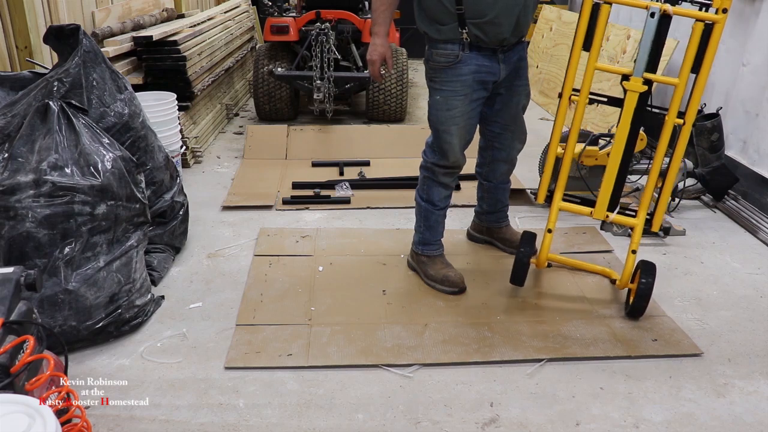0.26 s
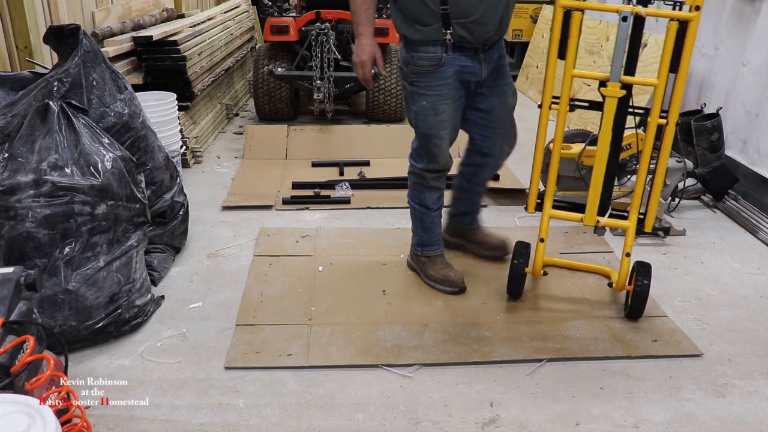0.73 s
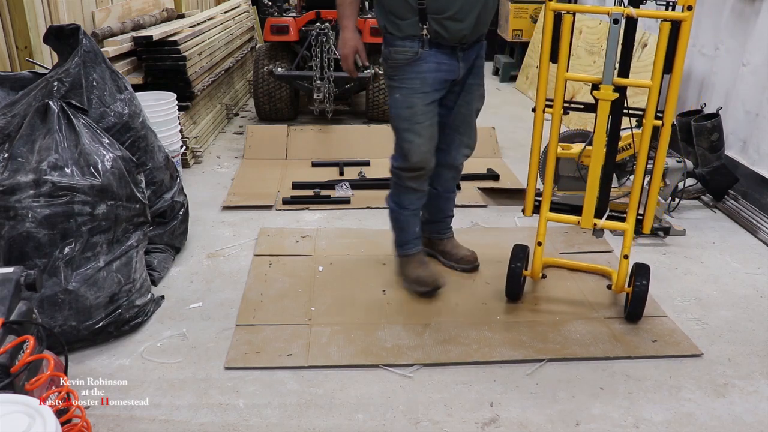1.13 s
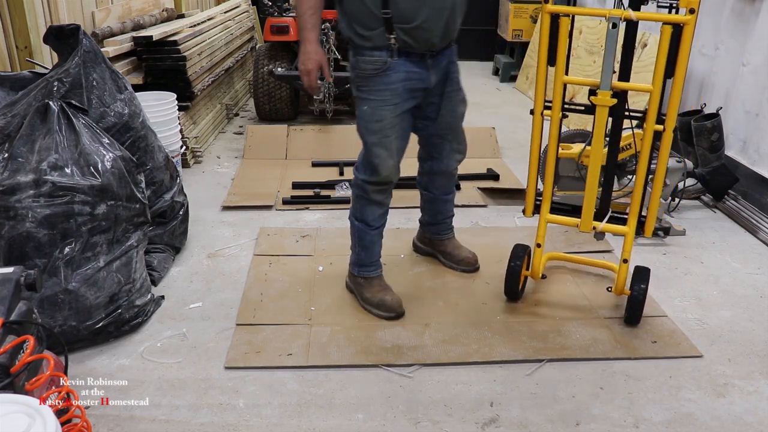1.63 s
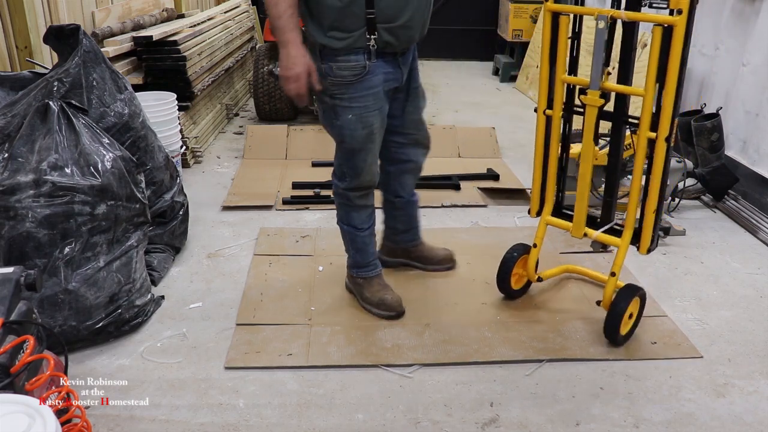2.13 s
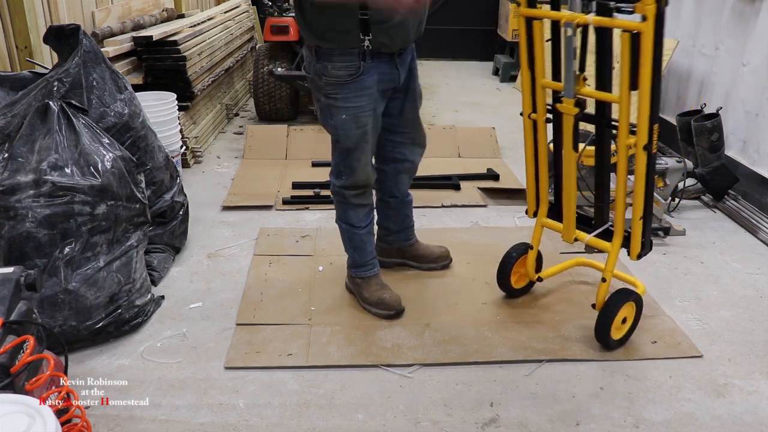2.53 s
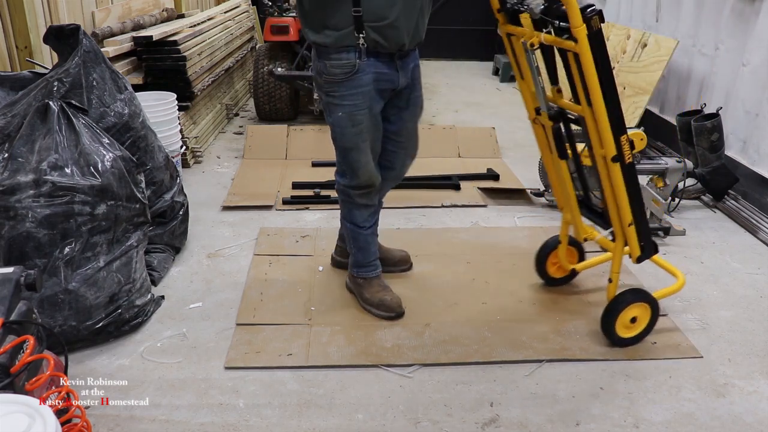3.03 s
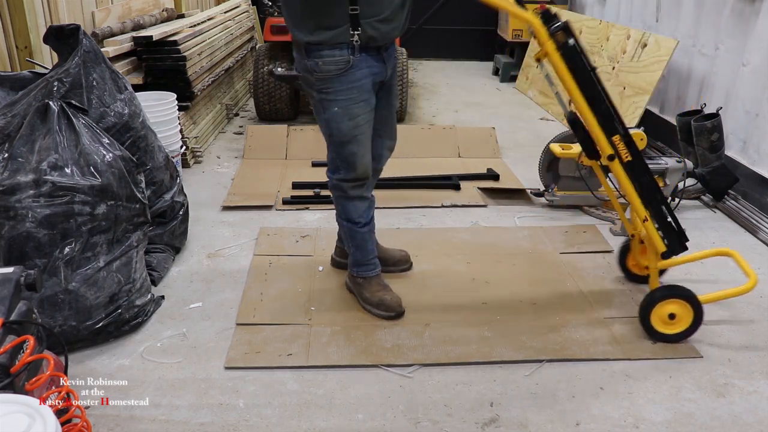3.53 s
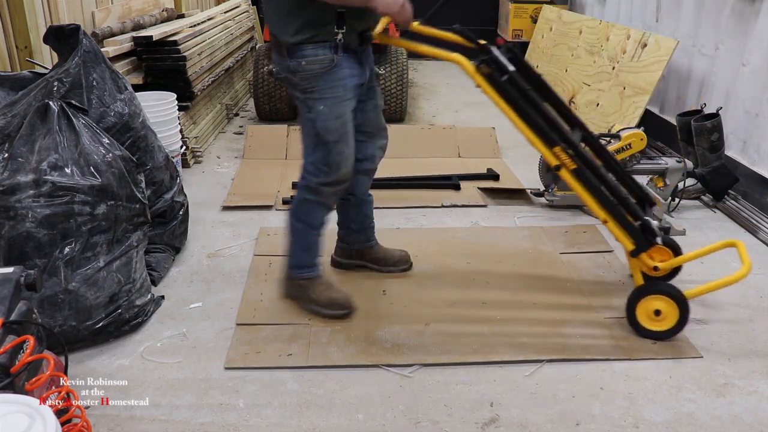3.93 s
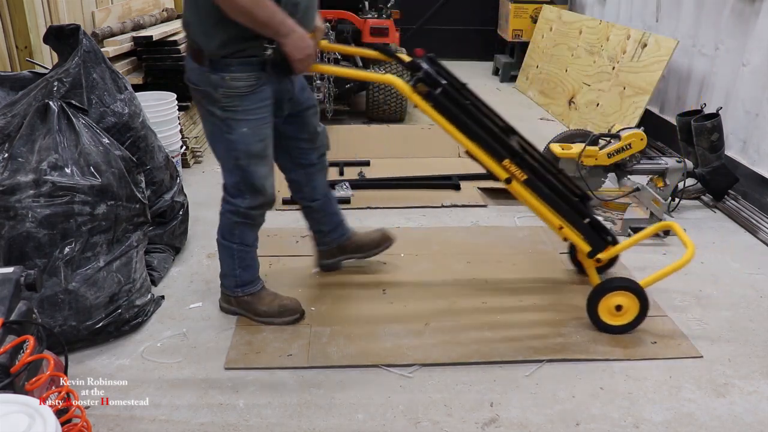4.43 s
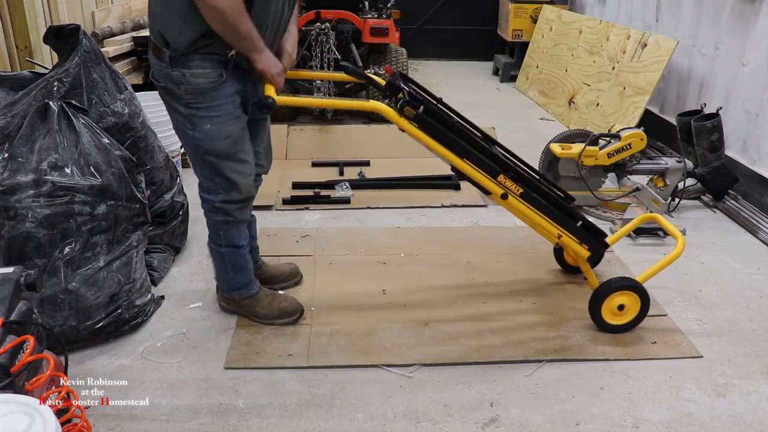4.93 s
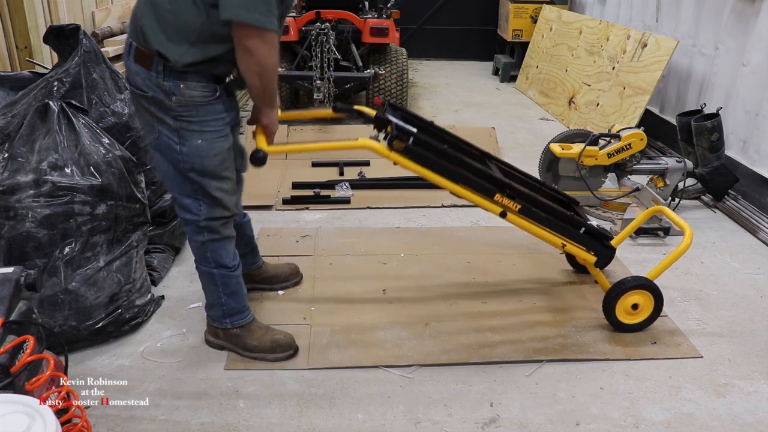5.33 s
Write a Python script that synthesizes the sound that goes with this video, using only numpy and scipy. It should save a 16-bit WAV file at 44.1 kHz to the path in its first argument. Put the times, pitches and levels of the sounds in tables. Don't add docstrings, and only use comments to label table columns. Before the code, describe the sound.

In a hard-surfaced workshop, boots shuffle on cardboard and a steel stand knocks in a loose cluster near the start. A short wheel slide follows, then a loud bright clack in the middle, more scuffs, a brief metallic squeal and a strong hollow thud near the end. Close stereo microphone, source slightly right, short reverberation over faint room tone.

```python
import sys
import numpy as np
from scipy import signal
from scipy.fft import rfft, irfft
from scipy.io import wavfile

SR = 44100
rng = np.random.default_rng(int(sys.argv[2]) if len(sys.argv) > 2 else 0)


def unload_audio(sound):
    columns = np.transpose(np.atleast_2d(sound))
    steps = np.round(np.clip(columns, -1, 1) * 32767)
    wavfile.write(sys.argv[1], SR, steps.astype(np.int16))


def makeup_ratio(level_db):
    decades = np.asarray(level_db, float) / 20
    return 10 ** decades


N = 245844


def at_hz(points, hz):
    table = np.array(points)
    return np.interp(np.log(hz), np.log(table[:, 0]), table[:, 1])


def in_time(rows, after_db=-120):
    s, *columns = np.transpose(rows)
    t = np.arange(N) / SR
    return [np.interp(t, s, column, left=-120, right=after_db) for column in columns]


def band(x, low_hz, high_hz):
    corners = [low_hz, min(high_hz, 0.45 * SR)]
    return signal.sosfilt(signal.butter(2, corners, "band", fs=SR, output="sos"), x)


def rms_one(x):
    return x / np.sqrt(np.mean(x ** 2) + 1e-20)


def ring(x, hz, t60):
    r, w = makeup_ratio(-60 / (t60 * SR)), 2 * np.pi * hz / SR
    return signal.lfilter([0, np.sin(w)], [1, -2 * r * np.cos(w), r * r], x + 1e-18)


def grit(per_s, spread_db):
    sizes = makeup_ratio(spread_db * np.minimum(rng.exponential(1, N), 5)) * rng.choice([-1, 1], N)
    catches = rng.random(N) < per_s / SR
    return rms_one(sizes * catches) + 0.56 * rng.standard_normal(N)


# frequency_hz, left_right_correlation [-1..1]
COHERENCE = [(100, 0.93), (300, 0.82), (600, 0.82), (1200, 0.19), (2500, 0.16), (8000, 0.075),
             (16000, 0.037)]


def stereo_bands(size):
    edges = 26 * 2 ** np.arange(0, 10, 0.5)
    white = rng.standard_normal((2, 2, size))
    for k, (low, high) in enumerate(zip(edges, edges[1:])):
        centre_hz = np.sqrt(low * high)
        mid, side = band(white[k % 2], low, high)
        alike = np.clip(at_hz(COHERENCE, centre_hz), -1, 1)
        yield centre_hz, np.sqrt(1 + alike) * mid + np.sqrt(1 - alike) * side * [[1], [-1]]


# start_s, level_db
RUSTLE = [(0.0, -33), (0.12, -58.5), (0.36, -45.5), (0.57, -44.5), (0.73, -56), (2.22, -42), (2.53, -63),
          (2.84, -58), (3.05, -44), (3.4, -40.5), (3.6, -40.5), (3.75, -40), (3.97, -43.5), (4.2, -44.5),
          (4.73, -33), (5.01, -46), (5.21, -63), (5.57, -36)]
RUSTLE_DB = [-20.5, -10.5, -10]
RUSTLE_FOLLOWS = [0.26, 1.0, 0.35]
# frequency_hz, level_db
HUM = [(18, -34), (30, 13.5), (81, 16), (479, 8.5), (639, 9), (1870, 9), (4420, 7), (15500, -38.5)]


def background():
    bustle_db = in_time(RUSTLE, after_db=RUSTLE[-1][1])[0]
    mean_db = bustle_db.mean()
    low_db, mid_db, high_db = (mean_db + db + share * (bustle_db - mean_db)
                               for db, share in zip(RUSTLE_DB, RUSTLE_FOLLOWS))
    bands = list(stereo_bands(N))
    hum = rms_one(sum(makeup_ratio(at_hz(HUM, hz)) * pair for hz, pair in bands))
    low = rms_one(sum(pair for hz, pair in bands if 90 < hz < 650))
    mid = rms_one(sum(pair / (1 + (hz / 3000) ** 2.0) for hz, pair in bands if hz > 650))
    high = rms_one(sum(pair * min(hz / 8000, 8000 / hz) ** 0.93 for hz, pair in bands if hz > 4000))
    return makeup_ratio(-54.5) * hum + makeup_ratio(low_db) * low + makeup_ratio(mid_db) * mid + makeup_ratio(high_db) * high


# frequency_hz, t60_s
SHOP_T60 = [(100, 0.22), (500, 0.49), (1400, 0.5), (4000, 0.5), (10000, 0.38), (16000, 0.04)]


def workshop(x, first_echo_s=0.0029, build_s=0.0019):
    places, stay_s = 4, 0.09
    size, out = 2 * SR // 3, 0
    t = np.arange(size) / SR
    place = (np.arange(N) / SR // stay_s) % places
    for k in range(places):
        tail = sum(pair * makeup_ratio(-60 * t / at_hz(SHOP_T60, hz)) for hz, pair in stereo_bands(size))
        tail *= np.clip((t - first_echo_s) / build_s, 0, 1) ** 0.5
        tail /= np.sqrt(np.sum(tail ** 2) / 2)
        out = out + signal.oaconvolve(x[None] * (place == k), tail, axes=1)[:, :N]
    return out


# start_s, peak_db
CRACKLES = [(0.0742, -29), (0.1131, -32), (0.1184, -21), (0.2628, -28), (0.3147, -21), (0.5177, -34),
            (0.5252, -44), (0.6559, -26), (1.1942, -22), (1.2164, -16), (1.3079, -25), (1.5114, -37),
            (1.5214, -30), (1.536, -29), (1.5948, -30), (1.6841, -26), (1.7614, -40), (2.0782, -28),
            (2.5127, -18.5), (3.1218, -36), (3.2156, -40), (4.144, -30), (4.581, -8), (5.3198, -18)]


def crackles():
    clicks = np.zeros(N)
    clicks[[round((s + 0.0004) * SR) for s, db in CRACKLES]] = makeup_ratio(np.array(CRACKLES)[:, 1] + 7)
    return band(clicks, 9700, 22000) * makeup_ratio(np.array([[-3], [3]]))


# start_s, peak_db
THUDS = [(0.932, -25), (1.588, -15), (1.63, -18), (3.019, -29), (3.688, -39), (4.258, -45), (4.284, -29),
         (4.777, -13.5), (4.857, -14.5), (4.886, -19), (5.071, -22), (5.243, -0.5), (5.26, -18),
         (5.293, -11), (5.49, -28), (5.547, -18)]
# pitch_hz, level_db, t60_s
SHEET = [(114, -7, 0.16), (244, -6.5, 0.067), (280, -2, 0.045), (390, -6.5, 0.023), (536, -14, .03),
         (750, -19, 0.036)]


def thuds():
    at = [round((s + 0.001) * SR) for s, db in THUDS]
    out = np.zeros(N)
    strengths = rng.normal(0, 1.5, (len(THUDS), len(SHEET)))
    for (hz, level_db, t60), strength_db in zip(SHEET, strengths.T):
        blows = np.zeros(N)
        blows[at] = makeup_ratio(np.array(THUDS)[:, 1] + level_db - 18.5 + strength_db)
        out += ring(blows, hz, t60)
    return band(out, 130, 1200)


# start_s, level_db
SQUEAL = [
    (4.478, -45),
    (4.486, -23),
    (4.504, -33),
    (4.562, -30.5),
    (4.608, -42),
    (4.626, -31.5),
    (4.72, -46),
]
# pitch_hz, width_hz, level_db, loudest_s, lasting_s
TUBE = [(4530, 53, 1, 4.54, 0.095), (4460, 84, 4.5, 4.645, 0.033), (4825, 67, 3.5, 4.65, 0.024),
        (2100, 7.3, -5, 4.52, 0.064), (3000, 68, -3.5, 4.56, 0.036), (3420, 110, 1.5, 4.635, 0.038),
        (2880, 52, -23, 4.65, 0.027), (5880, 62, -4, 4.67, .035), (5860, 70, -14, 4.53, 0.022),
        (1250, 8.2, -5, 4.6, 0.043), (1600, 9.7, 4.5, 4.66, 0.028), (5000, 91, -4.5, 4.56, .03),
        (7250, 70, -16, 4.59, 0.015)]


def squeal():
    force, t = makeup_ratio(in_time(SQUEAL)[0] - 6), np.arange(N) / SR
    slips = grit(per_s=2700, spread_db=-2.0)
    out = makeup_ratio(-1) * rms_one(band(slips, 1200, 7500))
    for hz, width_hz, db, at_s, lasting_s in TUBE:
        swell = np.exp(-((t - at_s) / lasting_s) ** 2)
        out += makeup_ratio(db) * swell * rms_one(ring(slips, hz, 2.2 / width_hz))
    flutter_db = 2.8 * rms_one(band(rng.standard_normal(N), 24, 45))
    return force * makeup_ratio(flutter_db) * out


# low_hz, high_hz
GRIT_BANDS_HZ = [(110, 720), (920, 1750), (1750, 5200), (5000, 15000), (1080, 1400)]
# start_s, level_db
SLIDE = [
    (2.1, -49),
    (2.124, -47),
    (2.144, -55),
    (2.16, -35),
    (2.236, -27),
    (2.32, -43),
]
SLIDE_COLOUR_DB = [-22.5, -10.5, -1.5, -3, -38]
# start_s, level_db, length_s, grittiness_db
HEELS = [
    (0.069, -38, 0.07, -12),
    (0.395, -24, 0.038, -3),
    (0.876, -35, 0.028, -25),
    (3.678, -21, 0.013, -6),
    (3.708, -21.5, 0.066, -39),
    (3.755, -34, 0.023, 2),
    (3.801, -31.5, 0.081, 6),
    (4.174, -37.5, 0.025, 14),
    (4.251, -23, 0.017, -12),
    (4.858, -31.5, 0.015, 11),
]
SOLES = [(0.937, -19, 0.054, -4), (1.189, -34, 0.034, -4.5), (1.43, -28.5, 0.04, 4.5),
         (1.542, -28.5, 0.011, 8.5), (1.591, -18, 0.019, -6.5), (1.933, -28.5, 0.022, -5.5),
         (3.018, -27, 0.031, 0.5), (4.192, -19, 0.066, -3), (4.781, -18.5, 0.044, 1),
         (5.062, -35, 0.027, -0.5), (5.09, -31, 0.014, -9), (5.322, -32.5, 0.017, 1),
         (5.49, -34.5, 0.11, 2), (5.551, -32.5, 0.086, -5)]
WHEELS = [(0.605, -7, 0.016, -12), (0.639, -22, 0.096, 0.5), (0.964, -22, 0.0089, 23),
          (0.988, -16, 0.036, -8), (2.842, -16, 0.02, 11), (2.924, -5.5, 0.036, -11),
          (2.946, -21, 0.077, 12.5), (3.172, -10.5, 0.021, -0.5), (3.21, -19.5, 0.048, -1),
          (3.328, -29, 0.019, 7), (3.837, -21.5, 0.025, 0), (4.704, -11.5, 0.032, -14),
          (4.814, -21, 0.03, 16), (5.203, -31.5, 0.18, 2.5)]
BRUSHES = [(0.004, -27.5, 0.076, -17), (2.928, -18, 0.07, -3), (0.654, -24.5, 0.012, 12.5),
           (1.309, -41, 0.03, 2), (1.471, -44, 0.028, 0), (1.825, -23, 0.027, -20), (2.512, -36, 0.093, -9),
           (2.736, -34.5, 0.063, 1), (3.56, -25.5, 0.02, 11), (4.309, -30, 0.1, -10),
           (4.576, -20, 0.043, 4), (5.245, -33.5, 0.029, 4.5), (5.347, -18, 0.01, 2.5)]
HEEL_DB = [-2.5, 4, 4.5, -54, -11]
HEEL_SHARE = [0, 0.16, 0.58, .3, 0]
SOLE_DB = [-2.5, -0.5, 4.5, 3.5, -36]
SOLE_SHARE = [0, 0.5, 0.86, 1, 0.16]
WHEEL_DB = [-18.5, -3.5, -10, -16, -3.5]
WHEEL_SHARE = [0.54, 0.16, 1, 0.96, -0.18]
BRUSH_DB = [-35, -12.5, -2.5, -1, -43]
BRUSH_SHARE = [0, 0, 0, 1, 0]


def scuffs():
    press = np.zeros((len(GRIT_BANDS_HZ), N))
    kinds = [(HEELS, HEEL_DB, HEEL_SHARE), (SOLES, SOLE_DB, SOLE_SHARE),
             (WHEELS, WHEEL_DB, WHEEL_SHARE), (BRUSHES, BRUSH_DB, BRUSH_SHARE)]
    for rows, colour_db, share in kinds:
        for s, db, length_s, grit_db in rows:
            bands_db = db + np.array(colour_db) + grit_db * np.array(share)
            at = round(s * SR)
            t = np.arange(min(SR // 3, N - at)) / SR
            shape = (1 - np.exp(-t / 0.00075)) * np.exp(-(t / max(length_s, 0.003)) ** 1.13)
            press[:, at:at + len(t)] += makeup_ratio(bands_db - 16)[:, None] * shape
    press += makeup_ratio(in_time(SLIDE)[0] - 2.5 + np.array(SLIDE_COLOUR_DB)[:, None])
    rub = grit(per_s=4000, spread_db=3.0)
    apart, out = rng.standard_normal((2, N)), 0
    for force, (low_hz, high_hz), width in zip(press, GRIT_BANDS_HZ, (0.066, 0.78, 1.0, 1.0, 0.94)):
        heard = band(force * (rub + width * apart), low_hz, high_hz)
        steady = band(rub + width * apart[0], low_hz, high_hz)
        out = -out + heard / np.std(steady)
    return out


# start_s, peak_db, pitch_hz, room_share_db
KNOCKS = [(0.074, -31, 2430, -12), (0.571, -21, 2730, -9), (0.605, -8, 2070, -6.5), (0.965, -13, 1620, 2.5),
          (0.988, -9, 1670, -7.5), (0.996, -13, 1310, -5.5), (1.004, -18, 1480, 0), (1.216, -24.5, 2550, 0),
          (1.227, -38, 2500, -3), (1.308, -18.5, 5000, -9.5), (1.471, -26, 1580, -3.5),
          (2.512, -30, 3480, -20), (2.938, -18.5, 1044, -1.5), (2.965, -28, 980, -6),
          (3.186, -29, 775, -4.5), (3.289, -21, 3100, -5), (3.561, -20.5, 3800, 5), (3.676, -23, 1700, 7),
          (3.745, -22.5, 1410, -6), (4.316, -22, 4620, 1), (4.706, -16, 1600, -18), (4.715, -23, 1200, -1),
          (4.782, -13.5, 3150, 2), (4.959, -23, 2100, -6)]
# start_s, peak_db, pitch_hz, room_share_db
SNAPS = [(0.113, -35.5, 1740, -1.5), (0.313, -36.5, 1950, 6), (0.613, -20.5, 1135, 1),
         (0.656, -29.5, 1100, -3), (0.913, -32.5, 1850, 0.5), (0.935, -21.5, 2860, 8.5),
         (1.21, -34, 2370, -3.5), (1.43, -26.5, 1150, -27), (1.512, -20, 2620, -2.5),
         (1.521, -28, 2400, -20), (1.537, -11, 2650, -10.5), (1.595, -30, 1280, -6), (1.762, -28, 2620, -9),
         (1.824, -11, 3400, -7), (2.077, -31.5, 2280, -1), (2.842, -17, 2570, -5), (2.849, -19.5, 1340, -2),
         (2.926, 1.5, 3040, -6.5), (3.173, -8.5, 2600, -6), (3.328, -22, 2860, -1.5),
         (3.632, -33.5, 1330, 0.5), (4.205, -20, 3370, -1), (5.321, -30.5, 1250, 2), (5.348, -23, 3320, 5)]
# pitch_hz, level_db, t60_s
FRAME = [(857, 0.5, 0.088), (1026, -50, 0.22), (1220, 0, 0.075), (1300, -9, 2.7), (1560, -35, 0.84),
         (1638, -18.5, 0.15), (1976, -14.5, 0.46), (2360, -20, 0.23)]


def ticks():
    direct, feed = np.zeros((2, N)), np.zeros(N)
    knock_crack_db, snap_crack_db = -25, -13
    contacts = [(*row, knock_crack_db) for row in KNOCKS] + [(*row, snap_crack_db) for row in SNAPS]
    shakes = rng.standard_normal((len(contacts), 400))
    n = np.arange(400)
    for (s, db, hz, room_db, bright_db), shake in zip(contacts, shakes):
        pan_db = np.clip(-3 - 6.5 * np.log2(hz / 2000), -8, 8)
        blow = (n == 0) + 0.13 * shake * np.exp(-n / 30.0)
        body = band(blow, hz / 1.8, hz * 1.8) + 0.1 * ring(blow, hz, 9.0 / hz)
        body = band(body, hz / 2.4, hz * 3.2)
        body = body / np.abs(body).max()
        crack = -band(blow, 5500, 15000)
        crack = makeup_ratio(bright_db + 13.0) * crack / np.abs(crack).max()
        floor_echo = 0.32 * np.roll(body + crack, 70)
        tick = makeup_ratio(db) * (body + crack + floor_echo)
        at = round((s + 0.0006) * SR)
        direct[:, at:at + 400] += tick * makeup_ratio(pan_db * np.array([[0.5], [-0.5]]))
        feed[at:at + 400] += makeup_ratio(db + room_db + 4.0) * (body + 1.05 * crack)
    frame = sum(makeup_ratio(db) * ring(feed, hz, min(t60, 0.4) * 0.79) for hz, db, t60 in FRAME)
    return direct + makeup_ratio(-48.5) * frame, feed + makeup_ratio(-44) * frame


def scene():
    struck, feed = ticks()
    rubbed = scuffs() + squeal()
    thud = thuds()
    direct = struck + crackles() + makeup_ratio(0.5) * rubbed + thud
    direct[0] = np.roll(direct[0], 2)
    room = workshop(feed + makeup_ratio(-4) * rubbed[0] + makeup_ratio(-6.0) * thud)
    return direct + room + background()


def low_pass(x):
    return signal.sosfilt(signal.butter(12, 16970, fs=SR, output="sos"), x)


# frequency_hz, left_minus_right_db
MIC_BALANCE = [(60, 0), (380, 0), (700, -0.5), (1290, 1), (2380, -3), (4400, -1.5), (8120, 0.5),
               (15000, -3.5)]


def record(dry):
    hz = np.fft.rfftfreq(N, 1 / SR) + 1
    tilt_db = at_hz(MIC_BALANCE, hz) / 2
    response_db = np.array([tilt_db, -tilt_db]) - 32 * (hz > 15850)
    coloured = irfft(rfft(dry) * makeup_ratio(response_db), N)
    ceiling = 0.8
    return low_pass(ceiling * np.tanh(coloured / ceiling))


dry = scene()
out = record(dry)
unload_audio(out)
```